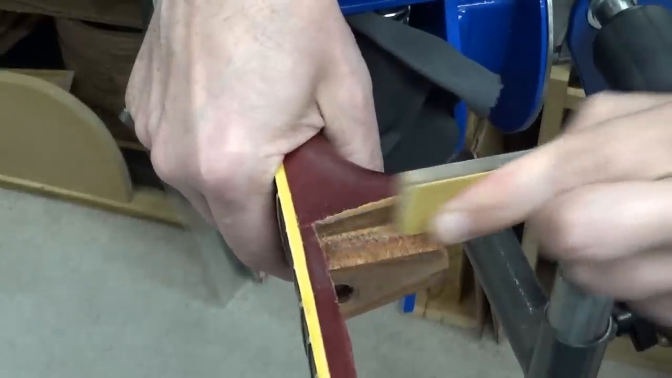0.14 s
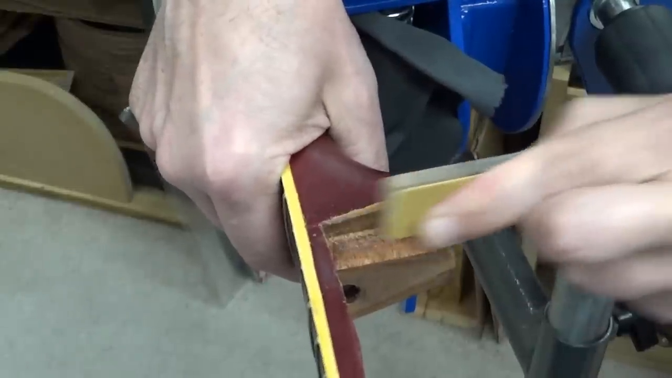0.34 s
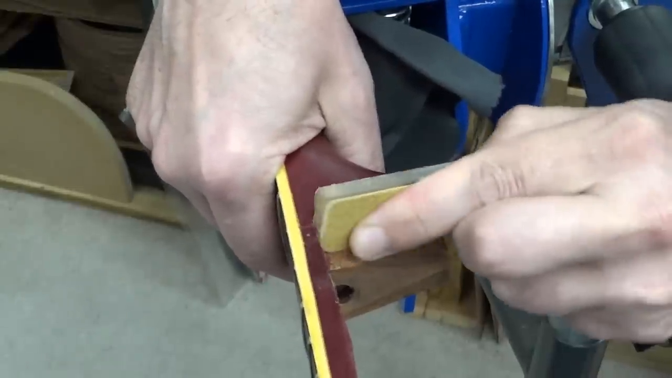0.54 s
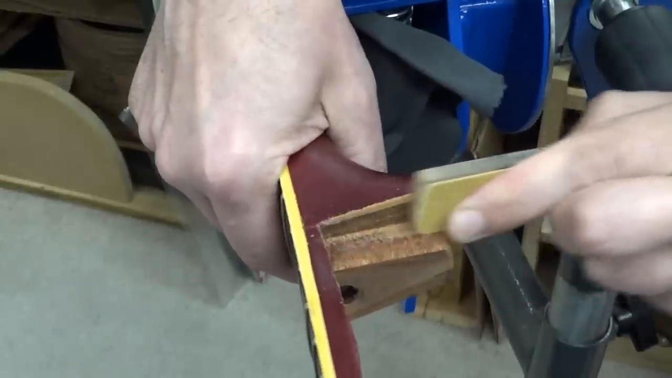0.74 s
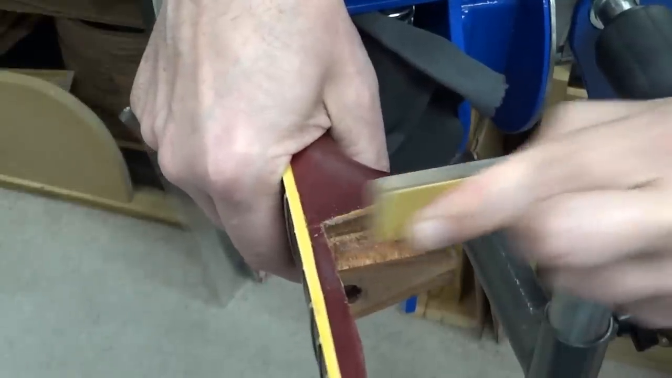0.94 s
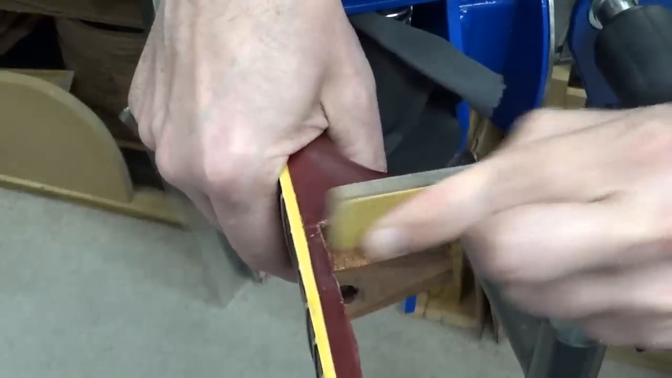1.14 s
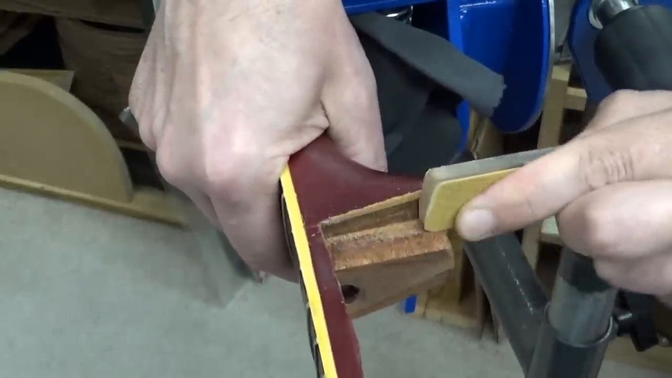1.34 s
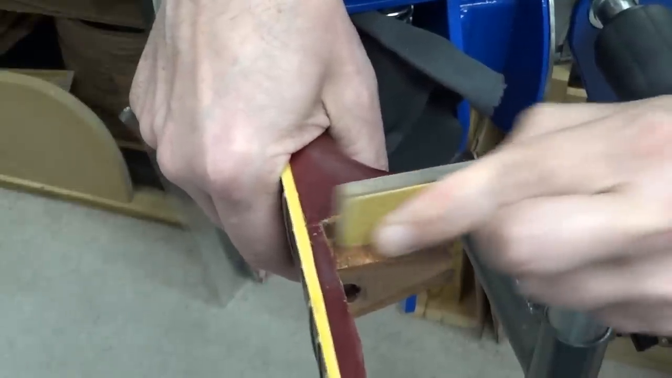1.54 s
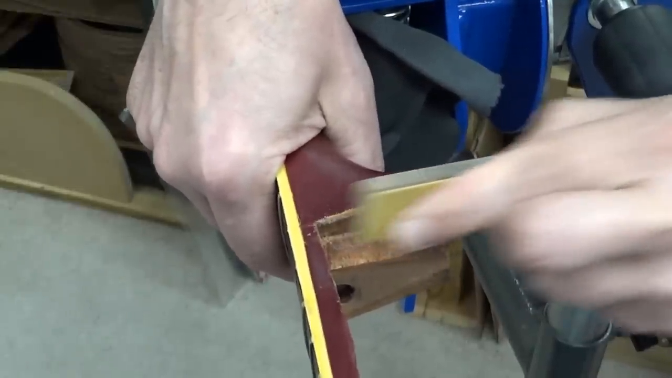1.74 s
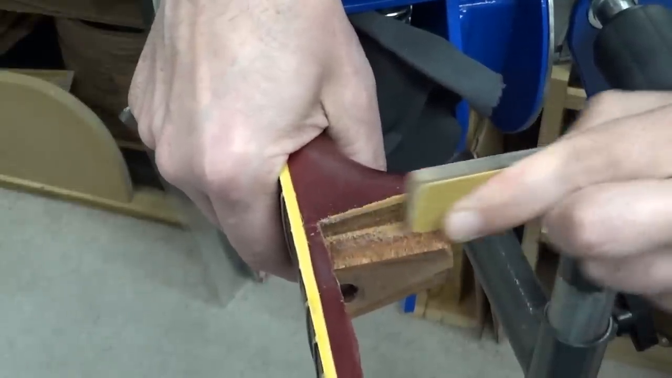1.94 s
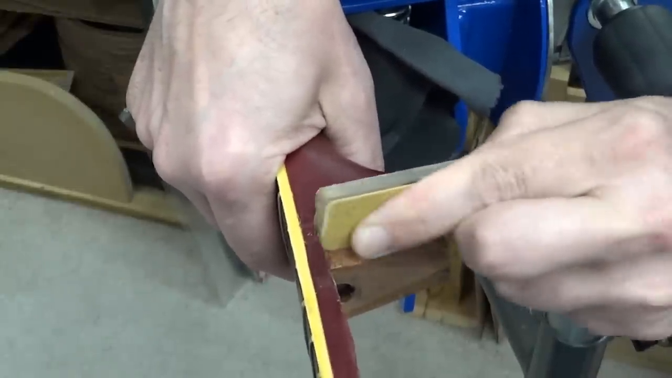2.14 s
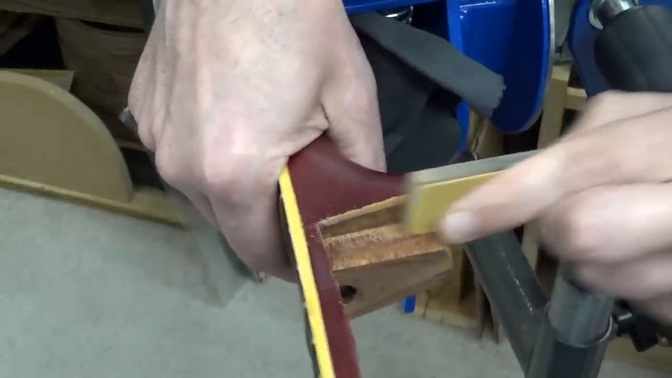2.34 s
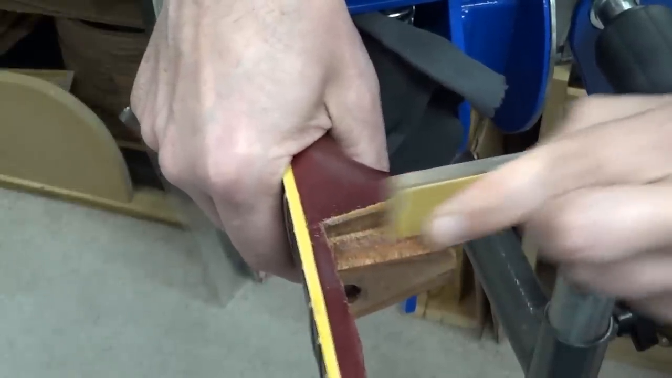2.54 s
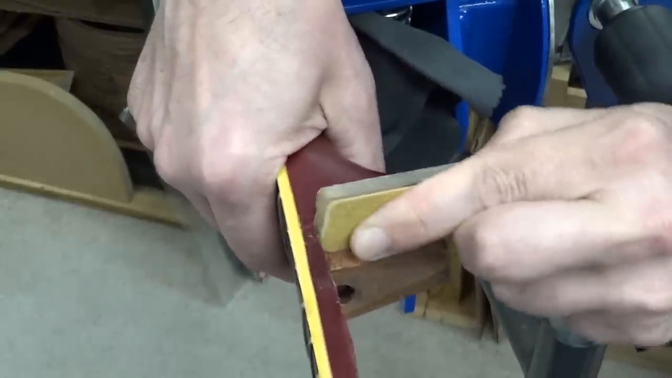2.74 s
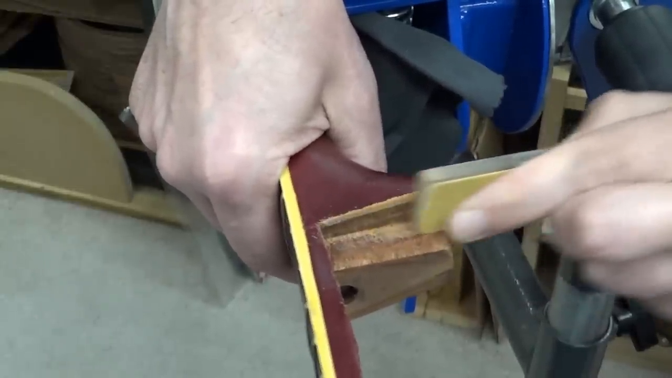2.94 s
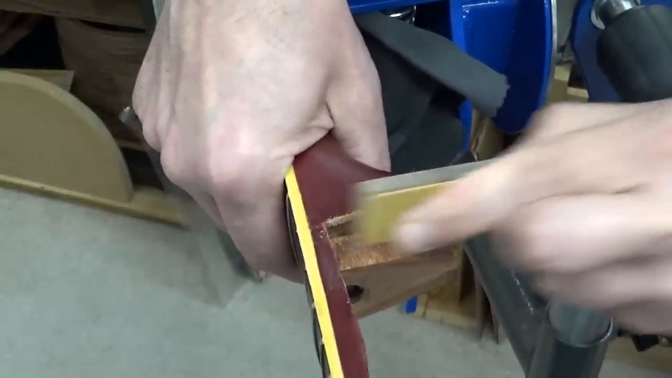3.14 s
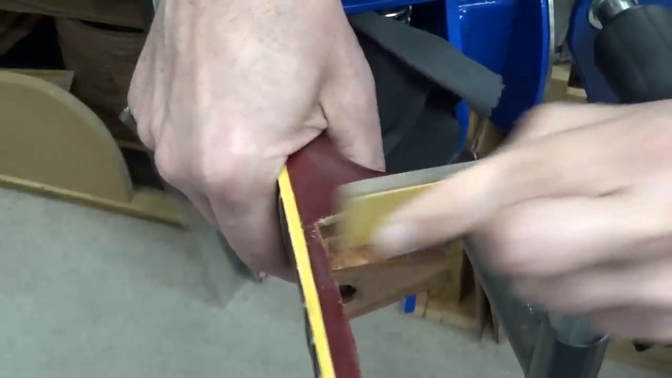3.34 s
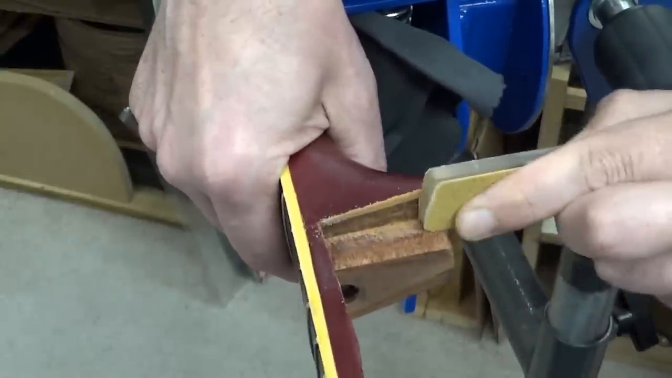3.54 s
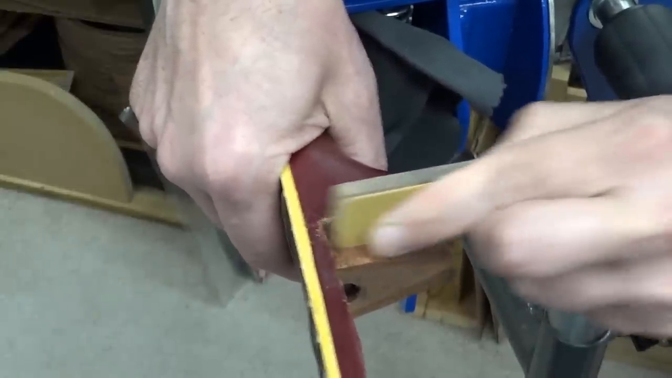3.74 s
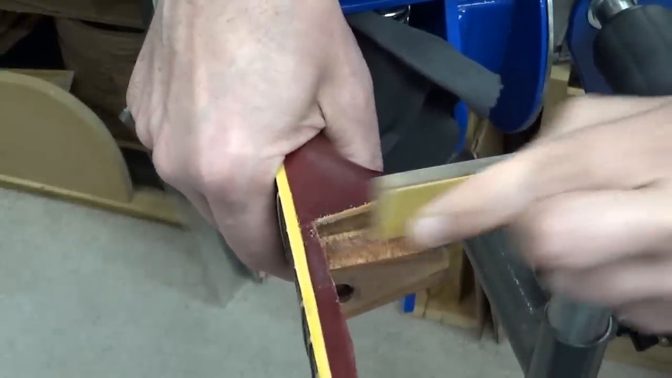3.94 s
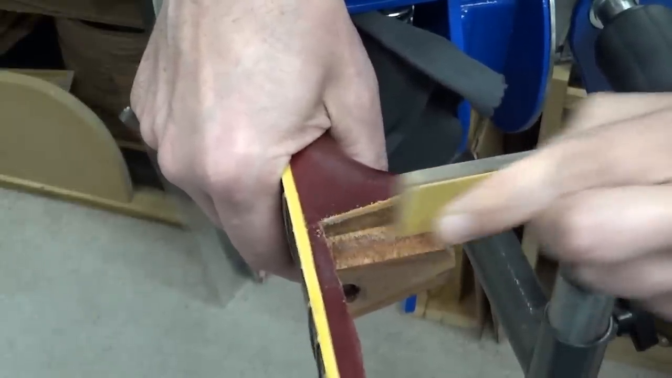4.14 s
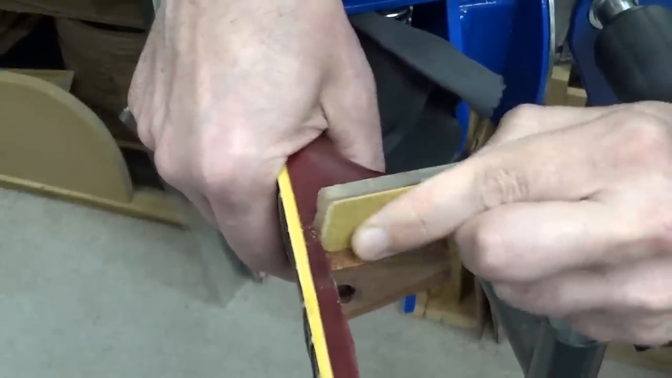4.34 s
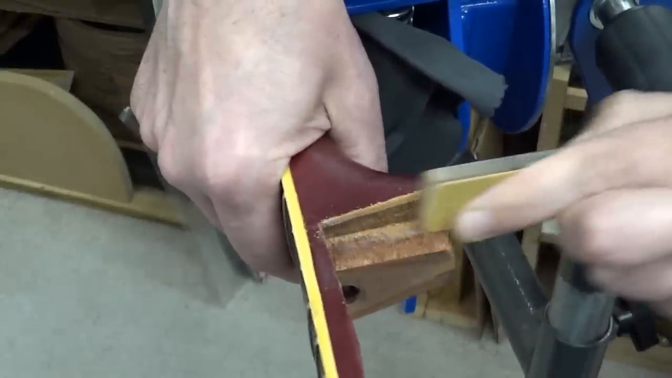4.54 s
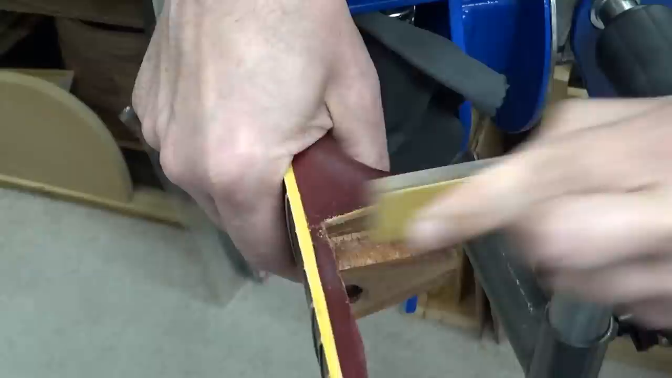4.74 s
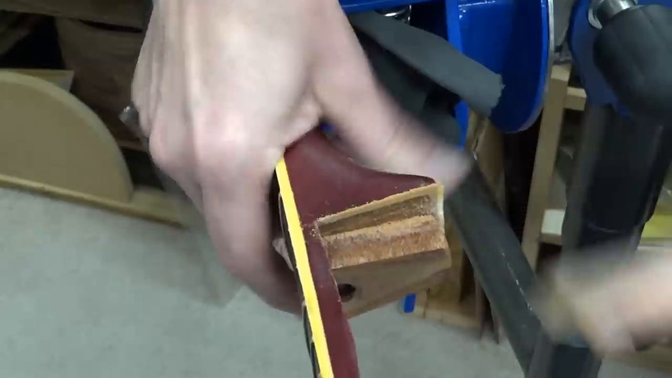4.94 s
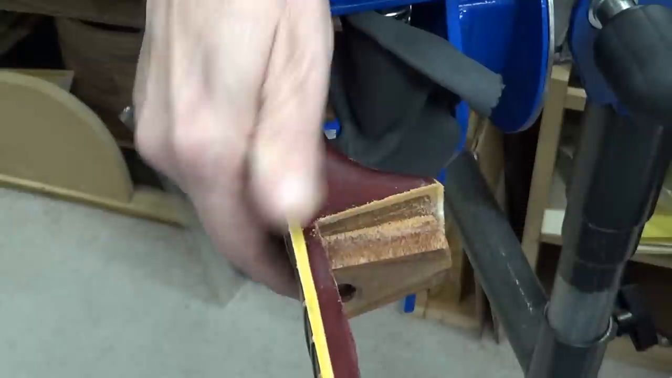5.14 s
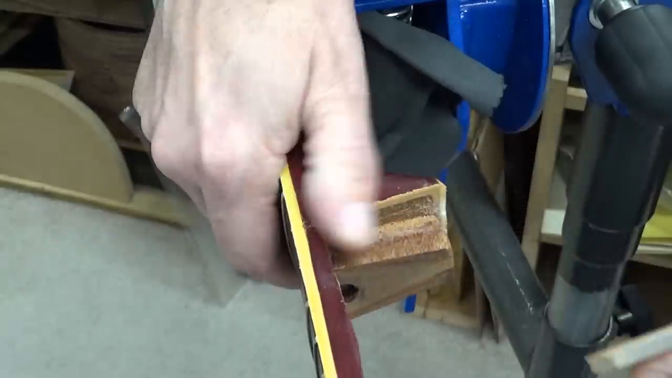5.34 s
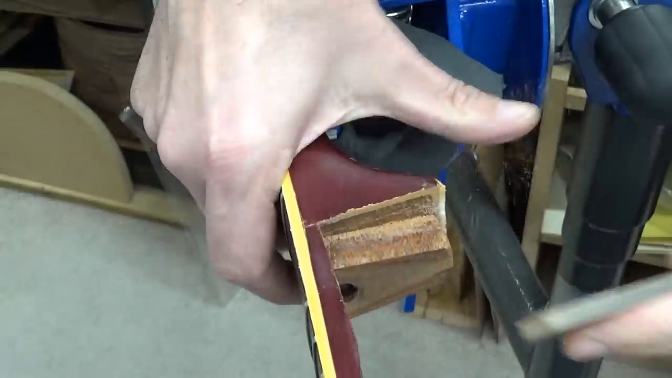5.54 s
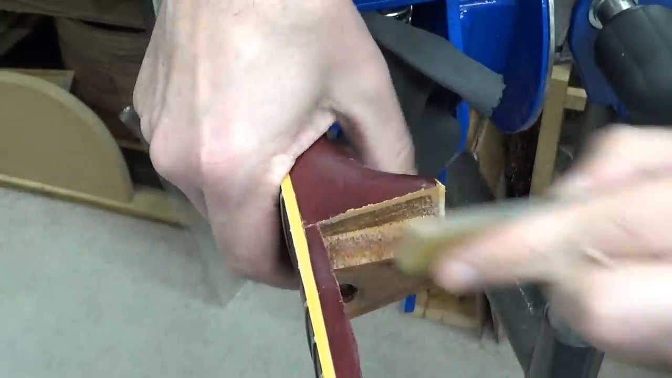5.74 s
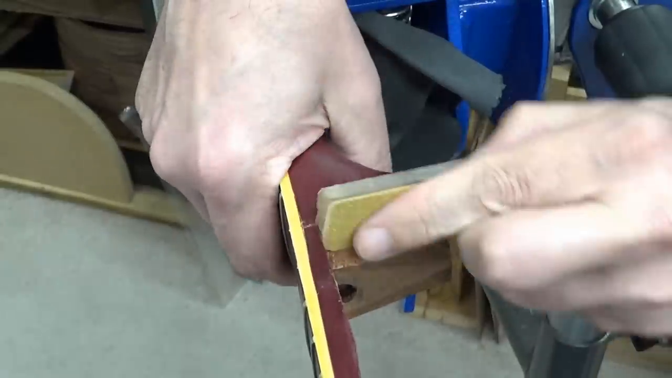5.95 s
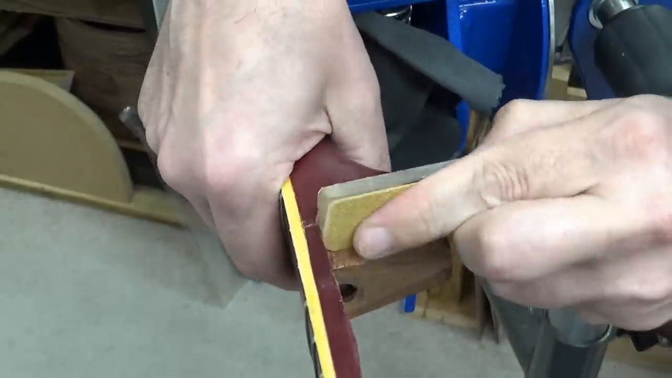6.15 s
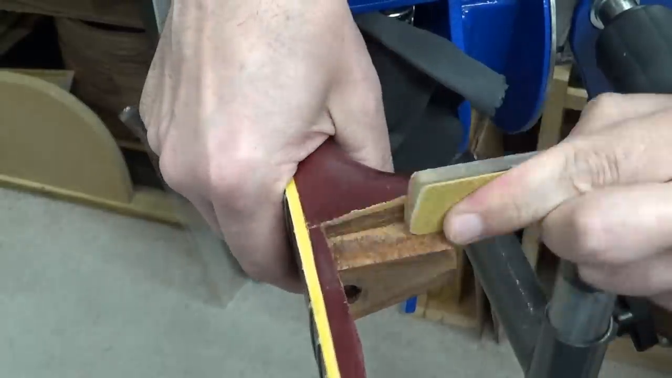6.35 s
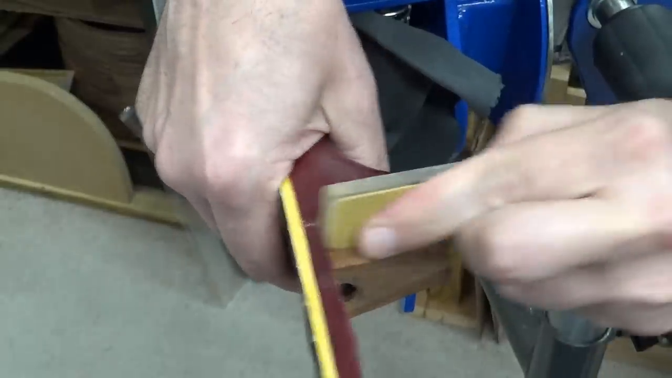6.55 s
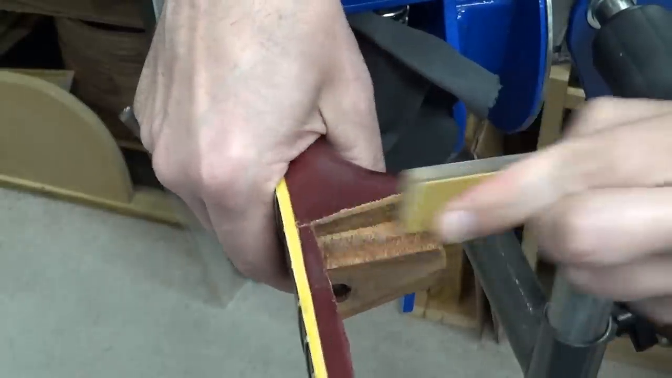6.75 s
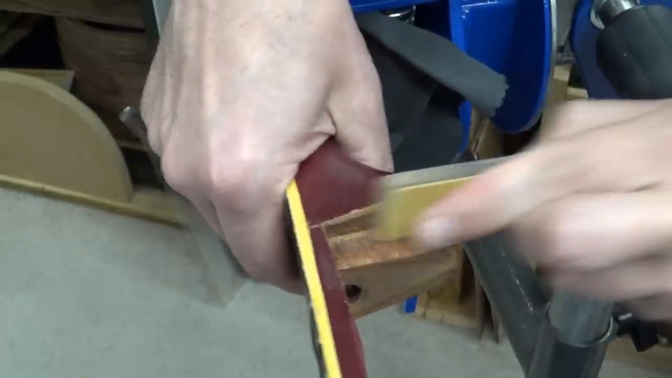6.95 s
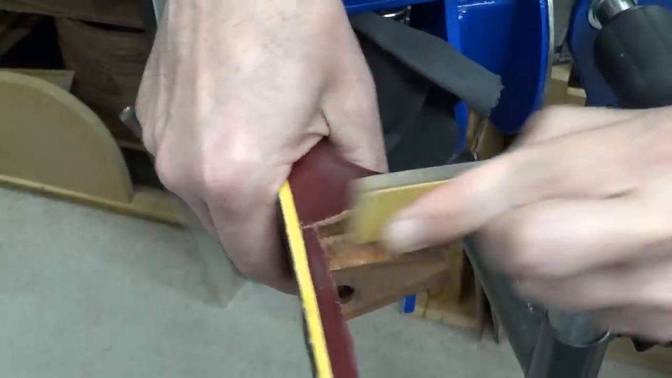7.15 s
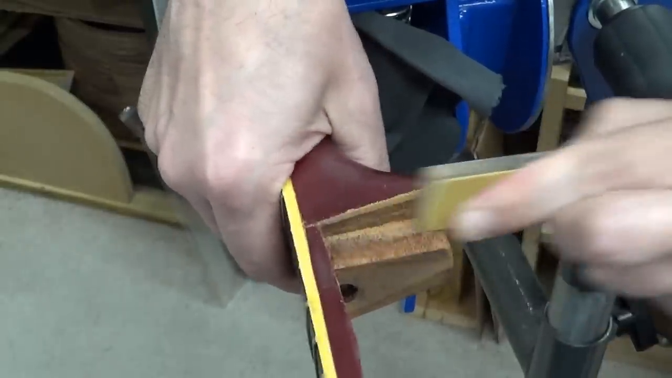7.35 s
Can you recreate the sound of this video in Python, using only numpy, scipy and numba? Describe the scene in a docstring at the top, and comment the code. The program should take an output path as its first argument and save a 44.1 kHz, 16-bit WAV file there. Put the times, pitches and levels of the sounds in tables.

```python
"""In a workshop, close to a stereo microphone, a sanding block rubs to and fro along a slot in hand-held wood.
Grit noise is shaped by each stroke, by the slot (a sweeping comb and resonances) and by the ringing wood.
Many pushes end in a knock at the end of the slot: impulses ring the wood, and weaker rebounds follow.
In a pause a thumb wipes off the dust and the block is set down again: light brushes of noise, and taps.
Behind, a machine hums in wavering sines over air noise; the close sounds leave a short, dull room tail."""
import sys
import numpy as np
from scipy import signal
from scipy.fft import rfft, irfft, next_fast_len
from scipy.io import wavfile
from scipy.ndimage import map_coordinates
from numba import njit

SR = 44100
rng = np.random.default_rng(int(sys.argv[2]) if len(sys.argv) > 2 else 0)


def master_out(mix):
    """Clip the mix to full scale and print it as 16-bit PCM to the path in sys.argv[1]."""
    frames = np.transpose(np.atleast_2d(mix))
    ceiling = np.clip(frames, -1, 1)
    pcm = np.round(ceiling * 32767).astype(np.int16)
    wavfile.write(sys.argv[1], SR, pcm)


N = 325899

# All levels are relative unless marked rms.
# machine hum lines: [f/Hz, rms level/dB]
HUM_LINES = [(91.5, -46), (199.2, -55.5), (242.2, -57), (452.2, -50), (812.9, -58), (866.7, -52.5),
             (1265, -66)]
# air noise of the workshop: [f/Hz, density/dB per Hz]
AIR_SPECTRUM = [(20, -8), (60, -9), (130, -9), (200, 0), (330, -4), (430, -1.5), (560, -8), (880, -11),
                (1050, -15), (1500, -18), (2100, -24), (2700, -23), (3700, -30), (8000, -35), (16000, -44)]
# share of the air noise that differs between the sides: [f/Hz, side-to-mid level/dB]
AIR_WIDTH = [(30, -35), (125, -31), (250, -22), (500, -14), (2000, -5), (16000, -16)]
# held wood shuddering as the arm turns round: [f/Hz, density/dB per Hz]
SHUDDER_SPECTRUM = [(15, -21), (28, 5.5), (42, -8.5), (70, -6), (110, -15.5), (145, 3), (200, -7.5),
                    (320, -12), (700, -40)]
# small sharp ticks of grit and block: [t/s, level/dB]
GRIT_SNAPS = [(0.6114, -27), (1.263, -23), (2.1694, -31), (4.976, -34), (5.3214, -32), (5.4783, -42)]
# light brushes of skin, paper or the set-down block over the wood: [start t/s, end t/s, level/dB, squeak f/Hz]
LIGHT_BRUSHES = [(4.825, 4.99, -50, 4200), (5.278, 5.383, -48, 4530), (5.394, 5.443, -50.5, 4240),
                 (5.455, 5.5, -44.5, 4080), (5.898, 5.983, -52, 4880), (6.233, 6.26, -117, 4150)]
# block set down on the wood: [t/s, level/dB]
BLOCK_TAPS = [(5.904, -23.5), (5.962, -30.5)]
# block against the end of the slot: [t/s, level/dB]
END_KNOCKS = [(0.262, -3), (0.575, -2), (0.891, -5), (1.828, -5), (2.153, 0), (2.477, -2.5), (2.777, -1),
              (3.091, -3), (3.414, -2.5), (3.727, -12.5), (4.374, -2.5), (6.527, -4.5), (6.873, -9)]
# resonances of wood and block: [f/Hz, width/Hz, level/dB]
WOOD_MODES = [(781, 23, -6), (902, 44, -10.5), (1050, 69, -3), (1123, 60, -4.5), (1191, 41.5, -3),
              (1281, 23, -17), (1328, 11.4, -3.5), (1545.6, 50.6, 0), (1948, 42, -10.5), (2110, 14, -8.5),
              (2632, 143, -14)]
# resonances of the slot under the block: [f/Hz, width/Hz, pull level/dB, push level/dB]
SLOT_MODES = [(4178, 65, 5, 5.5), (4445, 410, -9, -46.5), (6820, 165, -31.5, 2.5), (7124, 157, -3, -14),
              (10180, 360, -16.5, -13), (11100, 410, -10, -56)]
# what the rough slot walls leave of each echo: [f/Hz, level/dB]
ECHO_SPECTRUM = [(6500, -7.5), (8500, -6), (10500, -34), (13000, -14)]
# shape of the top of the hiss: [f/Hz, level/dB]
TREBLE_SPECTRUM = [(5000, -10), (7500, -12), (9200, 2.5), (11500, -2), (13000, -2)]
# hiss of the grit on the pull, then on the push: [f/Hz, density/dB per Hz]
PULL_SPECTRUM = [(150, -15.5), (600, -5), (1500, -2.5), (2300, 2.5), (3200, -1), (4500, 4), (5500, 2),
                 (7100, 6), (8100, 3), (9000, -3.5), (10000, 3), (11300, 4), (12400, -20), (16000, -20)]
PUSH_SPECTRUM = [(150, -17), (600, -2), (1500, 2.5), (2300, 2.5), (3100, 1.5), (4000, 6.5), (5500, 2.5),
                 (6800, 6), (8000, 5), (8800, -2.5), (10200, 6), (11300, -3), (12400, -13), (16000, -28)]
# block drawn out of the slot: [t/s at its fastest, level/dB]
PULL_STROKES = [(0.059, -22), (0.378, -19.5), (0.694, -20.5), (0.994, -18.5), (1.317, -20), (1.629, -19),
                (1.946, -20.5), (2.276, -18.5), (2.578, -20), (2.888, -19.5), (3.212, -18.5),
                (3.526, -19.5), (3.839, -21), (4.17, -20), (4.492, -19.5), (4.805, -18.5), (6.316, -23.5),
                (6.655, -19), (6.993, -20.5), (7.361, -19)]
# block pushed home: [t/s at its fastest, level/dB]
PUSH_STROKES = [(0.223, -19.5), (0.54, -20), (0.85, -19.5), (1.157, -20), (1.476, -19.5), (1.788, -19.5),
                (2.124, -18.5), (2.438, -20), (2.738, -20), (3.047, -20.5), (3.373, -18), (3.681, -20.5),
                (4.008, -22), (4.336, -19.5), (4.647, -22), (6.498, -22.5), (6.83, -23), (7.184, -19)]

TIME = np.arange(N) / SR  # s
SIDES = np.array([[1], [-1]])  # opposite sign on left and right
CUTOFF_HZ = 15900
SOUND_M_PER_S = 343
# length of block inside the slot, nominal
OVERLAP_OUT_M, OVERLAP_HOME_M = 0.042, 0.1
# resonance of the gap between block and slot
GAP_WIDTH_HZ = 590
# the travel stays the same, so a louder stroke is quicker: dB of duration lost per dB of level
HURRY = 0.17
# a knock brakes the block within this time and leaves this much of the rubbing
BRAKE_S, BRAKED_DB = 0.0038, -8
# shudder: delay after the fastest moment of a push, and level where no knock ends it
SHUDDER_AFTER_S, UNKNOCKED_DB = 0.035, -2.5
# chatter after a knock: mean spacing, mean level of the first rebound, mean loss from each to the next
REBOUND_S, FIRST_REBOUND_DB, REBOUND_LOSS_DB = 0.0037, -6, 2


def from_db(db):
    """Decibels to gain."""
    return 10 ** (np.asarray(db) / 20)


def rms_one(x):
    """Scale to rms 1."""
    return x / np.sqrt(np.mean(x ** 2) + 1e-20)


def butter(x, hz, kind, order=2):
    """Causal low- or high-pass."""
    sos = signal.butter(order, min(hz, .45 * SR), kind, fs=SR, output="sos")
    return signal.sosfilt(sos, x + 1e-18)


def coloured(x, spectrum):
    """Filter by (f/Hz, level/dB) points, joined over log frequency."""
    size = next_fast_len(N)
    hz, db = np.transpose(spectrum)
    bins_hz = np.fft.rfftfreq(size, 1 / SR)
    gain = from_db(np.interp(np.log(bins_hz + 1), np.log(hz), db))
    return irfft(rfft(x, size) * gain, size)[:N]


def drift(rate_hz):
    """Slow chance with spread 1: twice low-passed noise, drawn every 40 samples."""
    r = np.exp(-2 * np.pi * rate_hz * 40 / SR)
    noise = rng.standard_normal(N // 40 + 2002)
    slow = signal.lfilter([1], [1, -2 * r, r * r], noise)[2000:]  # drop the settling
    return np.interp(np.arange(N) / 40, np.arange(len(slow)), rms_one(slow))


def resonance(x, hz, width):
    """Two-pole resonance with gain 1 on top."""
    r = np.exp(-np.pi * width / SR)
    feed = np.array([1, 0, -1]) * (1 - r * r) / 2
    poles = [1, -2 * r * np.cos(2 * np.pi * hz / SR), r * r]
    return signal.lfilter(feed, poles, x + 1e-18)


@njit
def moving_resonance(x, hz, width):
    """Two-pole resonance whose centre glides."""
    y, r = np.zeros(len(x)), np.exp(-np.pi * width / SR)
    for i in range(2, len(x)):
        feed = (1 - r * r) / 2 * (x[i] - x[i - 2])
        y[i] = feed + 2 * r * np.cos(2 * np.pi * hz[i] / SR) * y[i - 1] - r * r * y[i - 2]
    return y


def clicks(events, spread_db=0):
    """One impulse for each (t/s, level/dB) row, with chance in its level."""
    s, db = np.transpose(events)
    out = np.zeros(N)
    out[np.round(s * SR).astype(int)] = from_db(db + spread_db * rng.standard_normal(len(s)))
    return out


def grit(grain_db, grains_per_s, clump_db):
    """Countless tiny scratches and fewer coarse ones, bunched as the paper catches and slips."""
    sizes = from_db(3.5 * np.minimum(rng.exponential(1, N), 3.5)) * rng.choice([-1, 1], N)
    coarse = rms_one(sizes * (rng.random(N) < grains_per_s / SR))
    fine = rng.standard_normal(N)
    bunching = from_db(clump_db * drift(60))
    return rms_one((fine + from_db(grain_db) * coarse) * bunching)


def knocks_ending(push_s):
    """Times of the knocks that cut short the stroke which is fastest at this moment."""
    return [s for s, _ in END_KNOCKS if push_s < s < push_s + .08]


def machine(hum_db, air_db, waver_hz, chirp_db, chirp_hz, turns_per_s):
    """Wavering hum lines over steady air noise, with a faint chirp on every turn of the motor."""
    hum = 0
    for hz, db in HUM_LINES:
        pitch = hz + waver_hz * np.sqrt(hz / HUM_LINES[0][0]) * drift(5.8)
        level = np.sqrt(2) * from_db(db + 0.5 * drift(2.8))
        hum = hum + level * np.sin(2 * np.pi * np.cumsum(pitch) / SR)
    once_a_turn = np.sin(np.pi * turns_per_s * TIME) ** 8
    chirp_noise = resonance(resonance(rng.standard_normal(N), chirp_hz, 330), chirp_hz, 330)
    chirp = once_a_turn * rms_one(chirp_noise)
    mid = rms_one(coloured(rng.standard_normal(N), AIR_SPECTRUM))
    side = coloured(rms_one(coloured(rng.standard_normal(N), AIR_SPECTRUM)), AIR_WIDTH)
    air = mid + side * SIDES
    return from_db(hum_db) * hum + from_db(chirp_db) * chirp + from_db(air_db) * air


def workshop(x, t60, wet_db, dull_hz):
    """A short, dull, diffuse tail of decaying noise, different on each side; t60 in s."""
    age = np.arange(SR // 2) / SR
    tail = rng.standard_normal((2, len(age))) * from_db(-60 * age / t60) * (age > .004)
    tail = tail / np.sqrt(np.sum(tail ** 2, axis=1, keepdims=True))
    dull_tail = butter(tail, dull_hz, "low", order=1)
    return from_db(wet_db) * signal.fftconvolve(x, dull_tail, axes=1)[:, :N]


def shudder(level_db, rise_s):
    """Each push ends in a dull swell of the hand-held wood: low noise that rises and dies away."""
    swell = np.zeros(N)
    for s, _ in PUSH_STROKES:
        age = np.maximum(TIME - s - SHUDDER_AFTER_S, 0) / rise_s
        push_db = 0 if knocks_ending(s) else UNKNOCKED_DB
        swell += from_db(push_db) * age * np.exp(1 - np.minimum(age, 50))
    return from_db(level_db) * swell * rms_one(coloured(rng.standard_normal(N), SHUDDER_SPECTRUM))


def small_sounds(snap_db, squeak_db):
    """Light brushes of grit noise, each with a faint resonant squeak, and lone snapping grains."""
    rub = grit(grain_db=-1.0, grains_per_s=760, clump_db=3.0)
    out = from_db(snap_db) * clicks(GRIT_SNAPS)
    for start, end, db, hz in LIGHT_BRUSHES:
        swell = np.sin(np.pi * np.clip((TIME - start) / (end - start), 0, 1))
        touch = from_db(db) * swell * rub
        out = out + touch + from_db(squeak_db) * resonance(touch, hz, 79)
    return butter(butter(out, 2200, "high"), 11800, "low", order=4)


def taps(level_db):
    """The bare edge of the block touches down: the knocks' modes, lighter and a little sharper."""
    touches = clicks(BLOCK_TAPS)
    ringing = sum(from_db(db) * resonance(touches, hz, width) for hz, width, db in WOOD_MODES)
    return from_db(level_db) * butter(resonance(ringing, 1500, 1800), 4500, "low", order=4)


def knocks(level_db, contact_hz, contact_width):
    """A blunt, paper-padded blow rings the low modes; the block rebounds, on the whole ever more weakly."""
    blows, turns = list(END_KNOCKS), np.arange(10)
    for s, knock_db in END_KNOCKS:
        early, hard = rng.standard_normal((2, len(turns)))
        after_s = REBOUND_S * (turns + 1 + .25 * early)
        rebound_db = knock_db + FIRST_REBOUND_DB - REBOUND_LOSS_DB * turns + hard
        blows += zip(s + after_s, rebound_db)
    ringing = 0
    for hz, width, db in WOOD_MODES:
        # chance levels are drawn afresh, so each blow excites the modes unequally
        ringing = ringing + from_db(db) * resonance(clicks(blows, spread_db=3.5), hz, width)
    # the padding rounds the attack and leaves only the middle of the range
    padded = butter(resonance(ringing, contact_hz, contact_width), 1740, "low", order=4)
    return from_db(level_db) * padded


def motion(strokes, length_s, fastest, steepness, wood_evenness):
    """Every stroke is one swell of speed: rubbing strength, progress along the slot, wood's share in dB."""
    strength, progress, ring_db = np.zeros((3, N))
    usual_db = np.mean([db for _, db in strokes])
    for s, level_db in strokes:
        louder_db = level_db - usual_db
        duration_s = length_s * from_db(-HURRY * louder_db)
        elapsed = fastest + (TIME - s) / duration_s  # share of the stroke
        on = (elapsed > 0) & (elapsed < 1)
        # half way along at the fastest moment
        progress[on] = elapsed[on] ** (np.log(.5) / np.log(fastest))
        strength[on] = from_db(level_db) * np.sin(np.pi * progress[on]) ** steepness
        for knock_s in knocks_ending(s):
            strength[on] *= np.interp(TIME[on], [knock_s, knock_s + BRAKE_S], [1, from_db(BRAKED_DB)])
        # the wood rings more evenly from stroke to stroke than the grit hisses
        ring_db[on] = -wood_evenness * louder_db
    return strength, progress, ring_db


def slot_echo(x, overlap_m, echo):
    """Sound also travels the block's length in the slot, once and again: a comb that sweeps with the stroke."""
    reach_m = overlap_m * (1 + .04 * drift(3))  # no two strokes reach quite as far
    late = np.arange(N) - reach_m / SOUND_M_PER_S * SR
    once = echo * map_coordinates(coloured(x, ECHO_SPECTRUM), [late], order=3, mode="nearest")
    again = echo * map_coordinates(coloured(once, ECHO_SPECTRUM), [late], order=3, mode="nearest")
    return x + once + again


def rasp(movement, hiss, slot_db, from_m, to_m, echo_db, glide_db, hiss_db, wood_db, ring_db,
         sheen_db, treble_db, slow_treble_db, late_treble_db):
    """Grit heard directly, through the slot and through the wood."""
    strength, progress, own_ring_db = movement
    strength = strength * from_db(.5 * drift(6))  # the hand presses unevenly
    scratch = grit(grain_db=-4.0, grains_per_s=3500, clump_db=1.16)
    direct = from_db(hiss_db) * rms_one(coloured(scratch, hiss)) * strength

    # the block rocks in the slot and detunes it a little
    rocking = 1 + .009 * drift(9)
    slot = 0
    for (hz, width, _, _), db in zip(SLOT_MODES, slot_db):
        slot = slot + from_db(db) * moving_resonance(scratch * strength, hz * rocking, width)
    slot = from_db(ring_db) * butter(slot, 12000, "low", order=4)
    overlap_m = from_m + (to_m - from_m) * (1 - np.cos(np.pi * progress)) / 2
    airborne = slot_echo(direct + slot, overlap_m, echo=from_db(echo_db))
    # the gap beside the block resonates, lower the deeper it lies in the slot
    gap = moving_resonance(direct, SOUND_M_PER_S / overlap_m, GAP_WIDTH_HZ)
    airborne = airborne + from_db(glide_db) * gap

    # the top of the hiss changes with the speed of the block and its place along the slot
    slowness = 1 - np.sin(np.pi * progress)
    bright_db = treble_db + slow_treble_db * slowness + late_treble_db * (progress - .5)
    airborne = airborne + (from_db(bright_db) - 1) * coloured(airborne, TREBLE_SPECTRUM)

    # the wood answers the pressure of the hand, and so swells less with speed than the hiss
    pressure = grit(grain_db=-10.0, grains_per_s=870, clump_db=0.5)
    pressure = pressure * from_db(own_ring_db) * strength ** 0.85
    wood = 0
    for k, (hz, width, db) in enumerate(WOOD_MODES):
        wood = wood + (-1) ** k * from_db(db) * resonance(pressure, hz, width)

    # the highest hiss scatters and reaches each side differently
    sheen = butter(rng.standard_normal(N), 11000, "high", order=3) * strength
    return airborne + from_db(wood_db) * wood + from_db(sheen_db) * sheen * SIDES


def scene():
    """Sanding close to the microphone, near the middle, in the room, over the hum."""
    hum = machine(hum_db=0.0, air_db=-42.5, waver_hz=0.767, chirp_db=-59.5, chirp_hz=2740, turns_per_s=27.0)
    low = hum + shudder(level_db=-38.5, rise_s=0.056)
    blows = knocks(level_db=28.0, contact_hz=940, contact_width=1070) + taps(level_db=32.5)

    _, _, pull_db, push_db = np.transpose(SLOT_MODES)
    outward = motion(PULL_STROKES, length_s=0.17, fastest=0.56, steepness=2.06, wood_evenness=0.4)
    homeward = motion(PUSH_STROKES, length_s=0.16, fastest=0.5, steepness=2.78, wood_evenness=0.14)
    pulls = rasp(outward, PULL_SPECTRUM, pull_db, OVERLAP_HOME_M, OVERLAP_OUT_M,
                 echo_db=-12.5, glide_db=-18.5, hiss_db=-5.0, wood_db=9.0, ring_db=8.0,
                 sheen_db=-29.0, treble_db=2.5, slow_treble_db=-5.5, late_treble_db=8.5)
    pushes = rasp(homeward, PUSH_SPECTRUM, push_db, OVERLAP_OUT_M, OVERLAP_HOME_M,
                  echo_db=-3.0, glide_db=-1.5, hiss_db=-8.0, wood_db=6.5, ring_db=0.0,
                  sheen_db=-43.0, treble_db=-1.1, slow_treble_db=13.5, late_treble_db=-15.5)

    near = pulls + pushes + blows + small_sounds(snap_db=12.0, squeak_db=16.0)
    room = workshop(near, t60=0.38, wet_db=-6.5, dull_hz=1860)
    # slightly to the right
    return (near + room) * from_db([[-.25], [.25]]) + low


def record(dry):
    """The top is cut steeply."""
    top_cut = signal.ellip(12, .1, 80, CUTOFF_HZ, fs=SR, output="sos")
    return signal.sosfilt(top_cut, dry)


dry = scene()
out = record(dry)
master_out(out)
```